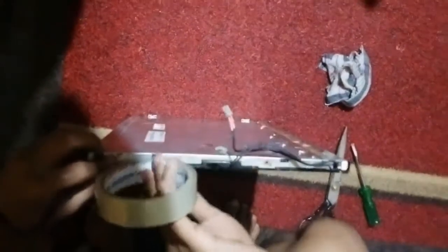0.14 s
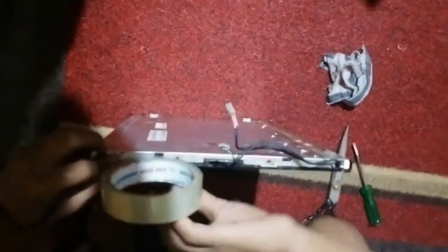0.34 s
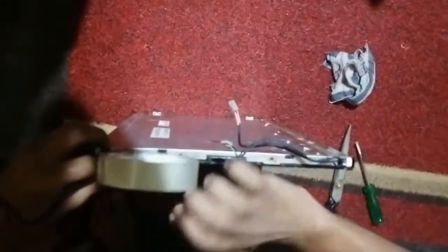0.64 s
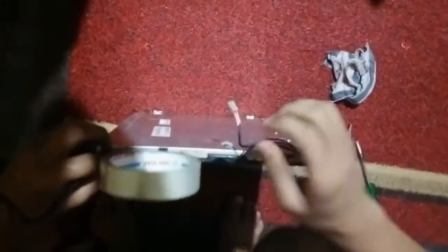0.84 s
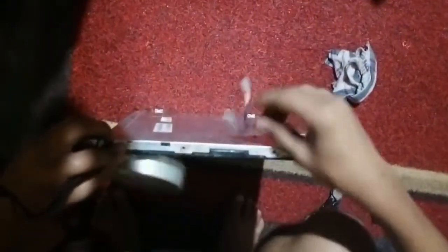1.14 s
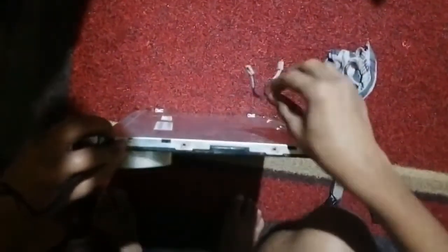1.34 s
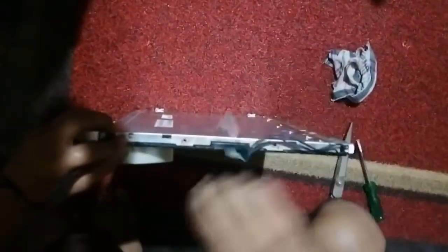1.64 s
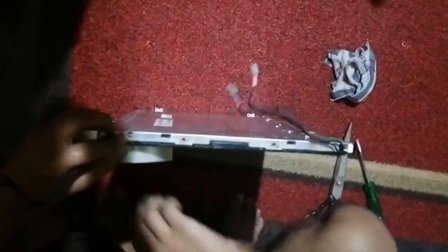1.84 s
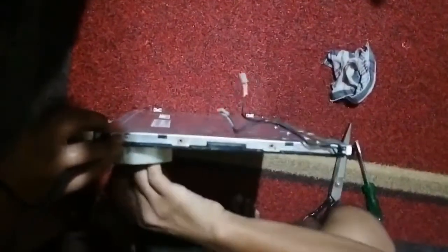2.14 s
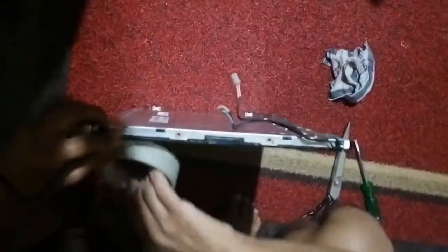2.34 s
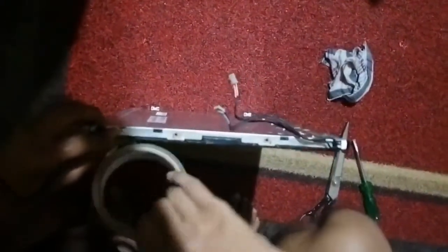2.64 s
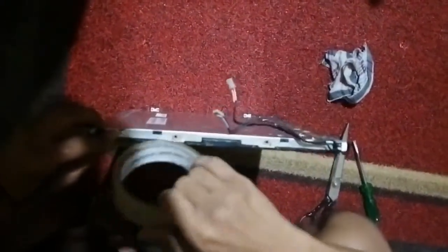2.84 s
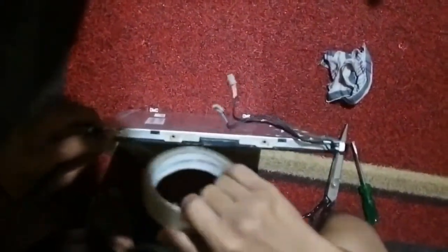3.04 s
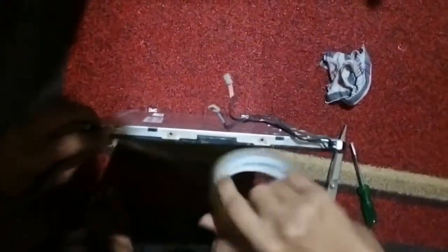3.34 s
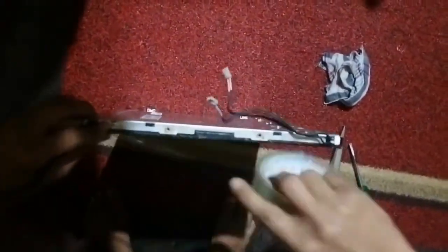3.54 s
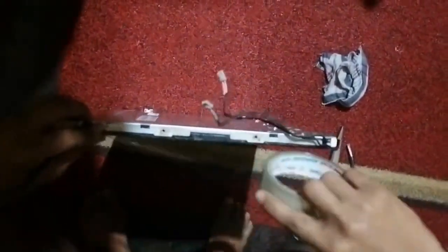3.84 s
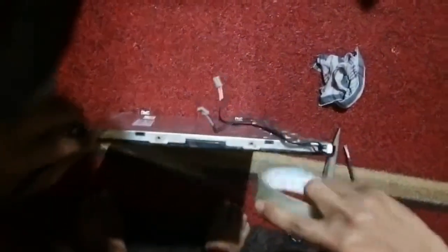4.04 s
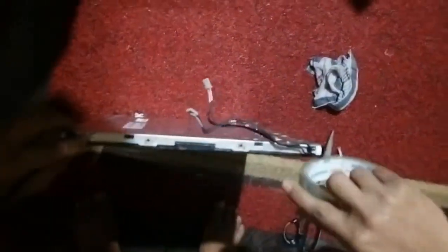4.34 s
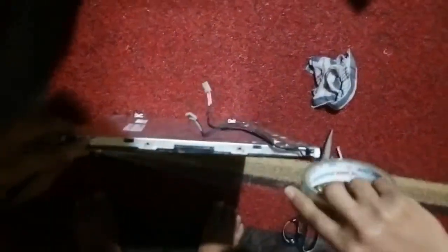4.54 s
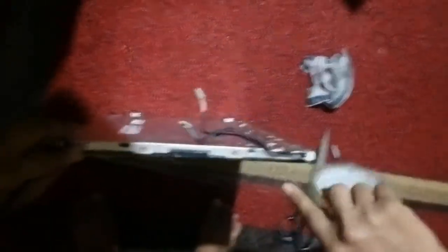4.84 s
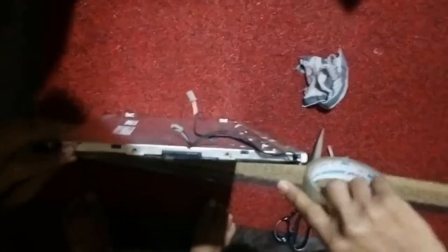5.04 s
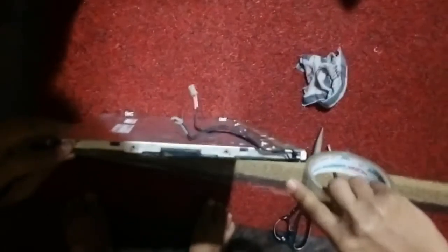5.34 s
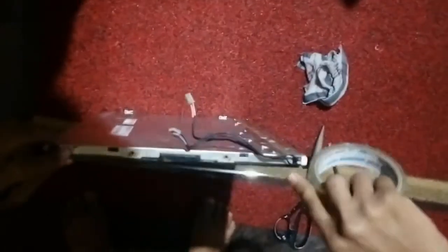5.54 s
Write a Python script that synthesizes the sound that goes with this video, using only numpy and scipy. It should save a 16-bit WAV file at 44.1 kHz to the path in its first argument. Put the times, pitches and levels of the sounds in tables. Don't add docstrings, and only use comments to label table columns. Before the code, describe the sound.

A quiet small room at night: soft air hiss, a steady high insect chorus with a higher one swelling and fading, and a faint cricket. At about 0.2 s the microphone mount gives one short creak. Around 1.2-1.35 s stiff plastic film snaps and crinkles in a bright, sharp cluster, with low bumps on a panel. Sparse light ticks and small crackles continue from 1.8 to 3.4 s, the strongest near 3.0 and 3.3. Then tape rips loudly off its roll, close up, in coarse rapid stutters: 3.5-3.6, 3.63-3.73 and 3.8-3.87 s. A slack web scrapes over an edge, fading by 4.2, when a longer, rougher rip runs to 4.37. A weaker drag follows at 4.4-4.8, then a short, brighter rip at 4.95-5.02. Tiny ticks, a very faint rising hum of taut tape near 5.35 and a soft thud at 5.55 end it, with short hard reflections throughout.

```python
import sys
import numpy as np
from scipy import signal
from scipy.fft import rfft, irfft, next_fast_len
from scipy.io import wavfile
from scipy.ndimage import map_coordinates

SR = 44100
rng = np.random.default_rng(int(sys.argv[2]) if len(sys.argv) > 2 else 0)


def gain_from_db(level_db):
    decades = np.asarray(level_db, float) / 20
    return 10 ** decades


def store_wav(level_fs):
    pcm = np.round(np.clip(np.atleast_2d(level_fs), -1, 1) * 32767)
    wavfile.write(sys.argv[1], SR, pcm.T.astype(np.int16))


N = 251370


def unit(x):
    return x / np.sqrt(np.mean(x ** 2) + 1e-20)


def along(points, hz):
    point_hz, values = np.transpose(points)
    return np.interp(np.log(hz + 1), np.log(point_hz + 1), values)


def curve(points):
    return np.interp(np.arange(N) / SR, *np.transpose(points))


def filtered(x, response):
    size = next_fast_len(len(x) + SR // 4)
    return irfft(rfft(x, size) * response(np.fft.rfftfreq(size, 1 / SR)), size)[:len(x)]


def mode(f, hz, width_hz):
    damping = 1j * f * width_hz
    return damping / (hz * hz - f * f + damping)


def noise(spectrum):
    return unit(filtered(rng.standard_normal(N), lambda f: gain_from_db(along(spectrum, f))))


def wobble(rate):
    knots = rng.standard_normal(int(N * rate / SR) + 4)
    return map_coordinates(knots, [np.arange(N) * rate / SR])


def fading(x, t60):
    return signal.lfilter([1], [1, -gain_from_db(-60 / (t60 * SR))], x)


def heard(x, start, room_db):
    # hz, t60_s, level_db
    walls = [(150, 0.36, -3), (600, 0.26, -10), (1533, 0.23, 0), (3520, 0.2, 3.5), (4230, 0.23, -11),
             (7200, 0.2, 3), (14500, .17, -8.5)]
    hz, t, cells = signal.stft(rng.standard_normal(SR // 2), SR, nperseg=128)
    wall_hz, wall_t60, wall_db = np.transpose(walls)
    t60 = np.interp(hz, wall_hz, wall_t60)[:, None]
    db = np.interp(hz, wall_hz, wall_db)[:, None]
    near_walls = 0.65 * (1 - np.exp(-t / 0.003))
    far_walls = 0.45 / (1 + np.exp(-(t - 0.024) / 0.003))
    decay = gain_from_db(db - 60 * t / t60)
    tail = signal.istft(cells * (near_walls + far_walls) * decay, SR, nperseg=128)[1]
    tail = gain_from_db(room_db) * tail / np.linalg.norm(tail)
    tail[0] = 1
    wet = signal.fftconvolve(x, tail)[:N - start]
    return np.pad(wet, (start, N - start - len(wet)))


def night():
    # hz, density_db
    air_spectrum = [(60, -36), (100, 2.5), (450, 1.5), (800, 3), (2650, 0.5), (3600, -4.5), (5500, -6.5),
                    (7300, -13.5), (9000, -7), (12000, -18), (16000, -25.5)]
    # centre_hz, width_hz
    bands = [(4177, 660), (7285, 770), (3330, 60), (59.6, 30)]
    # time_s, gain_db
    gain = [(0, 1), (1, 1.5), (3.4, 4), (3.95, -4), (4.9, -1), (5.7, -4.5)]
    # time_s, level_db
    effort = [(0, -10), (.5, -4), (1.3, 3.5), (2.1, -4), (2.4, 1.5), (3.2, -2), (4.9, -6), (5.2, -6),
              (5.43, 3.5), (5.57, -8), (5.7, -4.5)]
    # time_s, level_db
    motor = [(0, -78), (.9, -79), (2, -98), (2.4, -89), (3.2, -80), (4.2, -85), (4.6, -98.5), (5.5, -92),
             (5.7, -87.5)]
    air_db, low_chorus_db, high_chorus_db = -63.5, -66.5, -72.5
    swell_db = curve(effort)
    low_db = low_chorus_db + 0.046 * swell_db
    low, high, cricket, hum = [
        unit(filtered(rng.standard_normal(N), lambda f: mode(f, hz, width_hz) ** 2))
        for hz, width_hz in bands]
    chirps = gain_from_db(0.73 * wobble(22))
    ambience = gain_from_db(air_db + 1.2 * wobble(6)) * noise(air_spectrum)
    ambience += gain_from_db(low_db + 1.8 * wobble(13)) * low
    ambience += gain_from_db(high_chorus_db + swell_db + 1.9 * wobble(25)) * high
    ambience += gain_from_db(low_db - 9) * chirps * cricket
    ambience += gain_from_db(curve(motor) + 7) * hum
    return gain_from_db(curve(gain)) * ambience


def handling():
    # start_s, level_db, mode_hz, t60_s
    bumps = [(1.3, -55, 816, 0.11), (1.379, -55, 245, 0.29), (1.386, -56, 760, 0.18),
             (3.13, -60, 686, 0.093), (5.546, -52, 219, 0.035)]
    # time_s, level_db
    creak = [(0.201, -58), (.210, -63), (.217, -60), (.222, -39), (0.225, -22)]
    out, t = np.zeros(N + SR), np.arange(SR // 2) / SR
    for start_s, db, hz, t60 in bumps:
        puff = rng.standard_normal(len(t)) * gain_from_db(-60 * t / t60) * (1 - np.exp(-t / 0.0026))
        bump = filtered(puff, lambda f: mode(f, hz, 0.56 * hz))
        out[round(start_s * SR):][:len(t)] += gain_from_db(db + 23.5) * bump
    slips = np.zeros(N)
    for time_s, db in creak:
        slips[round(time_s * SR)] = gain_from_db(db + 21)
    t = np.arange(N) / SR
    slips += gain_from_db(-39) * rng.standard_normal(N) * (t > 0.203) * (t < 0.226)
    return out[:N] + filtered(slips, lambda f: -gain_from_db(8) * (f / 1500) ** 1.27 * np.exp(-(f / 1500) ** 2))


def stretch():
    # start_s, length_s, first_hz, last_hz, level_db
    hums = [(5.33, .09, 168, 215, -69.5), (5.415, 0.033, 163, 175, -67)]
    out = np.zeros(N)
    for start_s, length_s, first_hz, last_hz, db in hums:
        u = np.linspace(0, 1, round(length_s * SR))
        turns = np.cumsum(first_hz + (last_hz - first_hz) * np.sqrt(u)) / SR
        envelope = np.sqrt(np.abs(np.sin(np.pi * u)))
        out[round(start_s * SR):][:len(u)] += gain_from_db(db + 2.5) * envelope * np.sin(2 * np.pi * turns)
    return out


def slide():
    # first_s, last_s, first_db, last_db, low_db
    drags = [(3.894, 4.194, -44.5, -54, -10.5), (4.42, 4.825, -51.5, -61.5, -19.5)]
    # centre_hz, width_hz, gain_db
    panel = [
        [(1090, 61, 1.5), (1410, 100, -9), (2320, 40, 5.5), (2680, 20, -27), (3000, 80, -0.5), (3250, 23, -25),
         (3930, 73, -4.5), (4350, 55, -24.5)],
        [(943, 250, 7), (1395, 55, 10), (1690, 40, 12), (2055, 77, 7), (3070, 74, -0.5), (3330, 46, -17.5),
         (3640, 49, -2.5), (5500, 84, -23)],
    ]
    lift_db_per_s = 152
    out, t = np.zeros(N), np.arange(N) / SR
    for (first, last, first_db, last_db, low_db), peaks in zip(drags, panel):

        def body(f):
            broad = gain_from_db(-1.5) * mode(f, 2000, 1900) ** 2
            modes = broad + sum(gain_from_db(db) * mode(f, hz, width_hz + 15) for hz, width_hz, db in peaks)
            return modes / (1 + (f / 4700) ** 12) + gain_from_db(-14) * mode(f, 7000, 1800) ** 2

        rub = unit(filtered(rng.standard_normal(N), body))
        low = unit(filtered(rng.standard_normal(N), lambda f: mode(f, 305, 39)))
        low *= gain_from_db(low_db + 4.2 * wobble(12))
        drag_db = np.interp(t, [first, last], [first_db, last_db])
        drag_db += 0.58 * wobble(13) - lift_db_per_s * np.maximum(t - last, 0)
        out += (t > first) * gain_from_db(drag_db) * (rub + low)
    return out


def crinkle():
    # peak_s, level_db, rise_s, hold_s
    handfuls = [(1.299, -33, 0.0022, 0.0099), (2.158, -50.5, 0.025, .016), (2.345, -62, .02, 0.016),
                (2.519, -54, .01, .002), (2.7, -60.5, .12, .01), (2.769, -56, 0.0049, .002),
                (2.98, -51, .002, .008), (4.674, -69, 0.021, .03), (4.808, -68.5, 0.081, .018),
                (5.219, -77, .02, 0.054), (5.508, -71, .012, 0.058)]
    # hz, density_db
    film = [(300, -24), (1000, -13), (2000, -10.5), (3400, -7), (6000, 0.5), (9000, -10.5), (12000, -1),
            (16000, -20)]
    rise_db, release_db_per_s, snaps_per_s = 21.5, 850, 1500
    t, level = np.arange(N) / SR, np.zeros(N)
    for peak_s, db, rise_s, hold_s in handfuls:
        rise = rise_db * np.clip((peak_s - t) / rise_s, 0, 1)
        release = release_db_per_s * np.maximum(t - peak_s - hold_s, 0)
        level += (t > peak_s - rise_s) * gain_from_db(db - rise - release)
    sizes = gain_from_db(np.minimum(4 * rng.exponential(size=N), 9))
    snaps = (rng.random(N) < snaps_per_s / SR) * sizes
    return gain_from_db(3.5) * level * unit((fading(snaps, 0.024) + 0.13) * noise(film))


def specks():
    t = np.arange(N) / SR
    parts = (rng.random(N) < 28 / SR) * (t > 2.2) * (t < 3.47)
    parts = parts * gain_from_db(-39 + 3 * rng.standard_normal(N))
    return filtered(parts, lambda f: mode(f, 14000, 7000) ** 2)


def ticks():
    # start_s, ring_db, ring_hz, edge_db
    creases = [(1.1727, -37.5, 5200, -41), (1.1779, -34, 1600, -36), (1.2087, -38.5, 2280, -50),
               (1.283, -29, 4400, -25.5), (1.2961, -22.5, 5100, -24), (1.3029, -22, 3340, -20.5),
               (1.3072, -22.5, 4080, -26), (1.3116, -21.5, 2800, -35), (1.3327, -29, 2540, -51),
               (1.8165, -42, 5000, -56), (2.144, -41.5, 5100, -60), (2.522, -35.5, 2520, -62),
               (2.6347, -42, 6400, -51), (2.7003, -36.5, 2500, -45), (2.713, -38.5, 2400, -62),
               (2.771, -41.5, 3330, -39.5), (2.9768, -25, 1500, -31.5), (3.285, -28, 1215, -46.5),
               (3.3722, -37.5, 2370, -50.5), (5.2029, -46.5, 1850, -72), (5.345, -49, 2250, -75)]
    # start_s, ring_db, edge_db
    faint = [(0.318, -47.5, -60), (0.7498, -61, -59), (0.9114, -56, -66), (1.2742, -38, -45),
             (1.6894, -63, -58), (2.257, -60, -57), (2.3946, -44, -57), (2.4364, -42.5, -58),
             (2.5118, -53, -57), (2.5932, -52, -53), (2.6863, -56, -58), (2.8348, -56, -66),
             (2.9186, -42.5, -50.5), (3.133, -43, -53), (3.2257, -49, -59), (3.2674, -46, -54),
             (3.4444, -48.5, -70), (5.211, -59, -51.5), (5.5096, -50, -59)]
    faint_hz, room_db, wetter_per_db = 3700, -2.5, 0.28
    creases = list(creases) + [(s, ring_db, faint_hz, edge_db) for s, ring_db, edge_db in faint]
    out, t = np.zeros(N), np.arange(SR // 40) / SR
    for start_s, ring_db, ring_hz, edge_db in creases:
        snap = 0.25 * rng.standard_normal(len(t)) * gain_from_db(-60 * t / 0.013)
        snap[0] = 1
        ring = filtered(snap, lambda f: mode(f, ring_hz, 1.29 * ring_hz) ** 2)
        edge = filtered(snap, lambda f: mode(f, 11000, 10000) ** 2)
        tick = gain_from_db(ring_db + 18) * ring + gain_from_db(edge_db + 19.5) * edge
        out += heard(tick, round(start_s * SR), room_db - wetter_per_db * (ring_db + 39))
    return out


def peel():
    # first_s, last_s, slips, first_db, last_db
    pull_runs = [
        [(3.490, 3.551, 19, -13, -12), (3.5565, 3.5684, 3, -9, -8), (3.572, 3.6, 8, -17, -25)],
        [(3.6328, 3.695, 19, -10, -14), (3.698, 3.735, 11, -16, -27)],
        [(3.8073, 3.8222, 4, -9, -5), (3.827, 3.87, 13, -16, -26)],
        [(4.2118, 4.2721, 9, -4, -8), (4.2771, 4.3005, 5, -11, -8), (4.3135, 4.3364, 4, -6, -6),
         (4.341, 4.37, 8, -16, -28)],
        [(4.9532, 4.9706, 2, -10.5, -8), (4.96, 5.022, 16, -20, -23), (4.9916, 4.9916, 1, -7, -7)],
    ]
    # jerk_hz, crackle_db, tilt_db_per_octave, web_hz, web_db
    pulls = [(1500, -5.5, -0.67, 250, -14.5), (1530, -7, -0.14, 193, -18), (1445, -6, -0.8, 175, -24),
             (1415, -8, -0.84, 160, -33), (1890, -7.5, 1.4, 158, -32.5)]
    # dip_hz, depth (0-1)
    shadow = [(4500, 0.4), (6200, 0.2), (4620, 0.7), (2800, 0.33), (7800, 0.43)]
    # hz, density_db
    glue = [(200, -26.5), (380, -35), (560, -2.5), (1000, -6), (1800, -5), (3200, -0.5), (6000, -7),
            (11500, -7.5), (16000, -12)]
    # centre_hz, width_hz, gain_db
    core = [(583, 56, -5), (970, 270, -6), (1750, 300, -9.5)]
    fast_gap_s, ragged, even = 0.0045, 0.318, 0.036
    turned_s, room_db = 4.9, -9.5
    out, length, lead = np.zeros(N), SR // 2, SR // 100
    for runs, pull, (dip_hz, depth) in zip(pull_runs, pulls, shadow):
        jerk_hz, crackle_db, tilt_db, web_hz, web_db = pull
        start, slips = round(runs[0][0] * SR) - lead, np.zeros(length)
        for first, last, count, first_db, last_db in runs:
            u = np.linspace(0, 1, round(count))
            scatter = ragged if last - first < fast_gap_s * (len(u) - 1) else even
            inner = u * (1 - u) > 0
            luck = rng.standard_normal((len(u), 2)) * inner[:, None]
            slip_s = first + (last - first) * (u + scatter * luck[:, 0] / len(u))
            slip_db = first_db + (last_db - first_db) * u + 6 * scatter * luck[:, 1]
            at = np.round(SR * slip_s).astype(int) - start
            slips += np.bincount(at, gain_from_db(slip_db), length)

        facing = np.sign(runs[0][0] - turned_s)
        jerks = facing * gain_from_db(31.5) * filtered(
            slips, lambda f: (f / jerk_hz) ** 2 * np.exp(-(f / jerk_hz) ** 2))
        threads = unit(filtered(
            rng.standard_normal(length),
            lambda f: gain_from_db(along(glue, f) + tilt_db * np.log2((f + 1) / 1800))))
        tearing = fading(slips, 0.037) + 0.2 * fading(slips, 0.028) - 1.2 * fading(slips, 0.002)
        tearing = np.roll(tearing, 20)
        web = gain_from_db(web_db + 43.5) * filtered(slips, lambda f: mode(f, web_hz, 36))
        rip = jerks + gain_from_db(crackle_db - 5) * tearing * threads + web

        def path(f):
            ringing = sum(gain_from_db(db) * mode(f, hz, width_hz) for hz, width_hz, db in core)
            return 1 - depth * mode(f, dip_hz, 0.35 * dip_hz) + ringing

        out += heard(filtered(rip, path), start, room_db)
    return out


def scene():
    background = night() + handling()
    film = stretch() + slide() + heard(crinkle() + specks(), 0, 0.66) + ticks()
    return (background + film + peel())[None]


def roll_off(x):
    return signal.sosfilt(signal.butter(12, 16650, fs=SR, output="sos"), x)


def record(dry):
    # hz, gain_db
    microphone = [(90, -9.5), (135, -4), (2500, -1), (3600, 1.5), (4100, -2), (5400, 1), (6300, -5),
                  (7400, 0.5), (8200, -8.5), (9600, -7.5), (11500, -6.5), (14000, -13), (15600, -18),
                  (15950, -39.5)]
    hiss = unit(filtered(rng.standard_normal(N), lambda f: mode(f, 13000, 9000) ** 2))
    picked_up = dry[0] + gain_from_db(-78.5) * hiss
    mix = filtered(picked_up, lambda f: gain_from_db(along(microphone, f)) * (f < 16600))
    return roll_off(mix[None])


dry = scene()
out = record(dry)
store_wav(out)
```